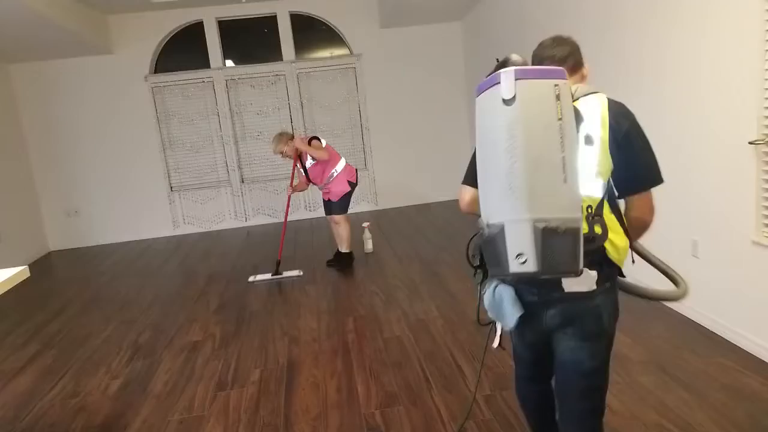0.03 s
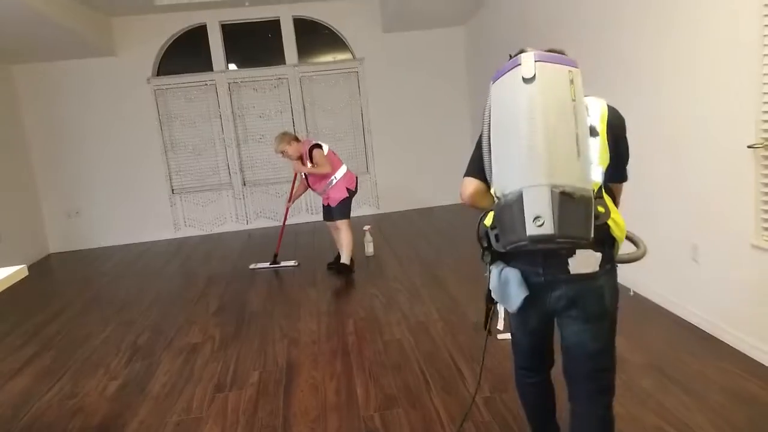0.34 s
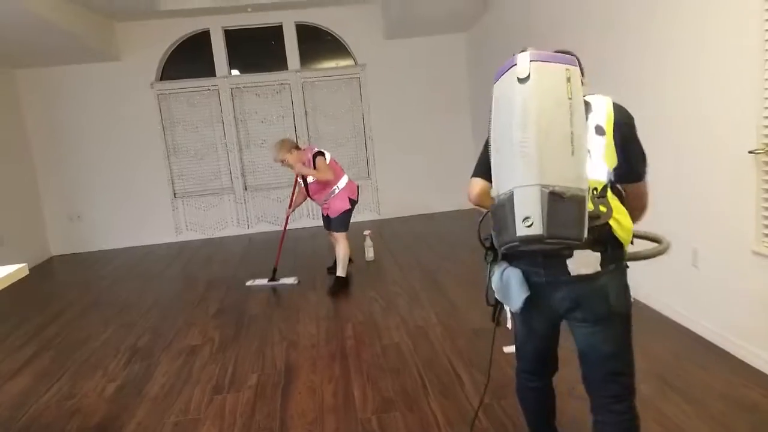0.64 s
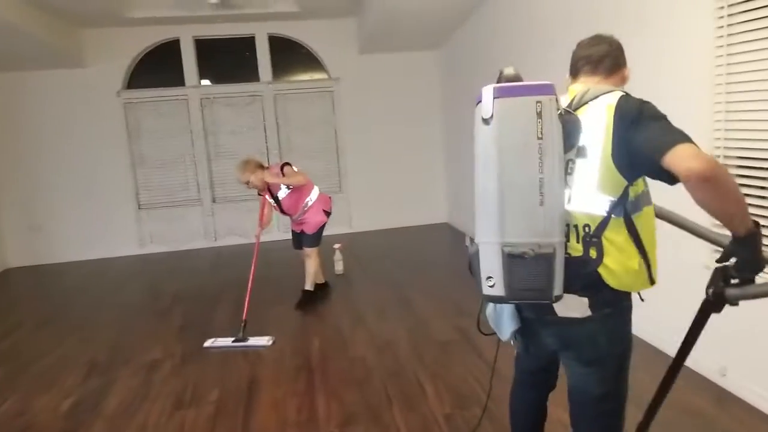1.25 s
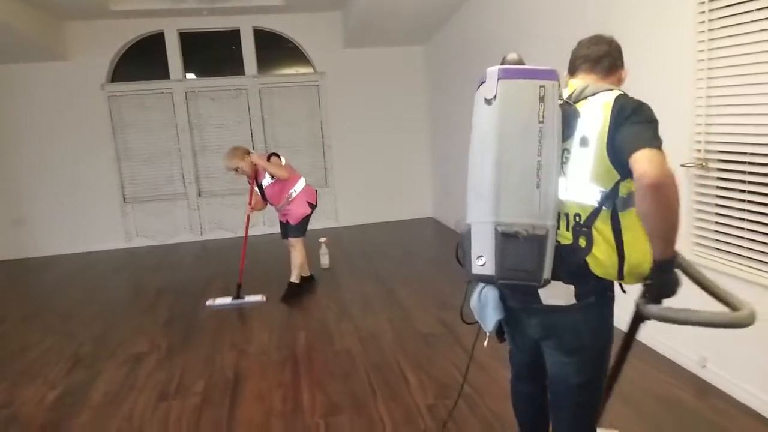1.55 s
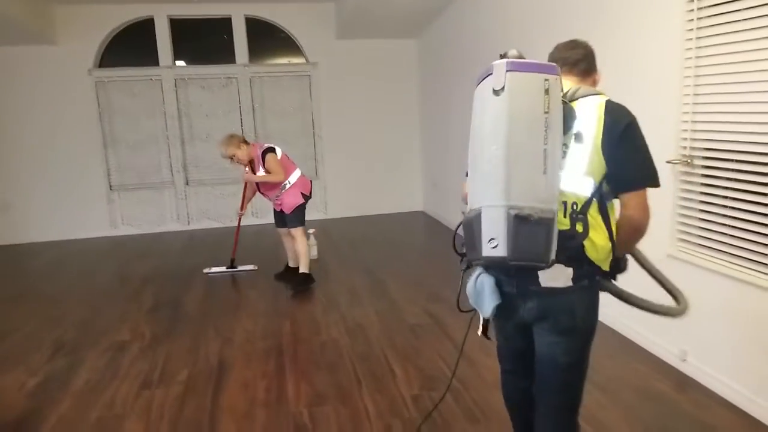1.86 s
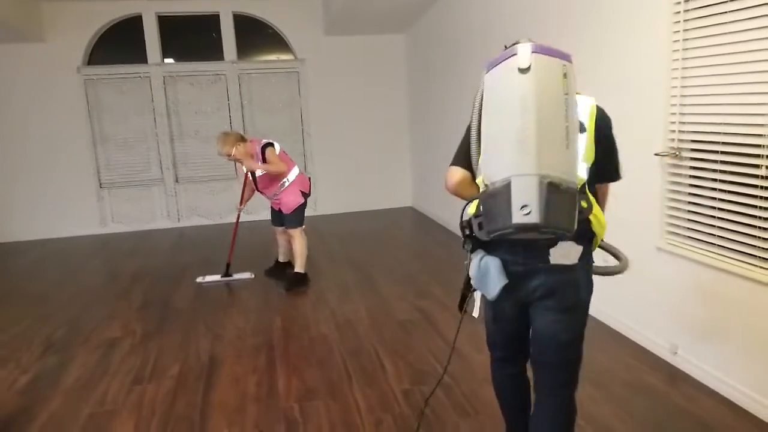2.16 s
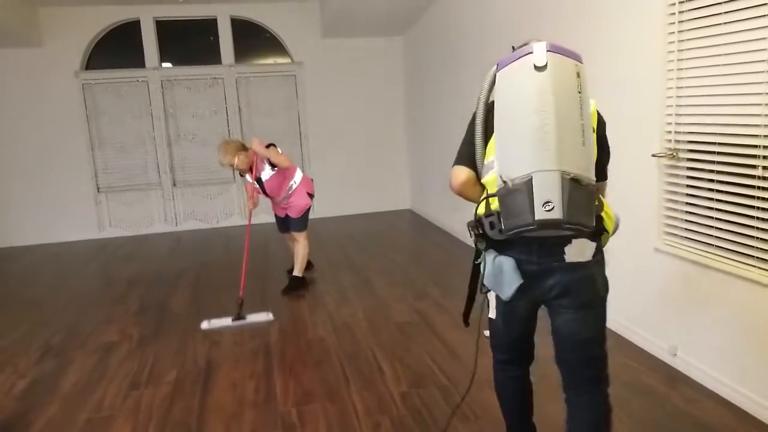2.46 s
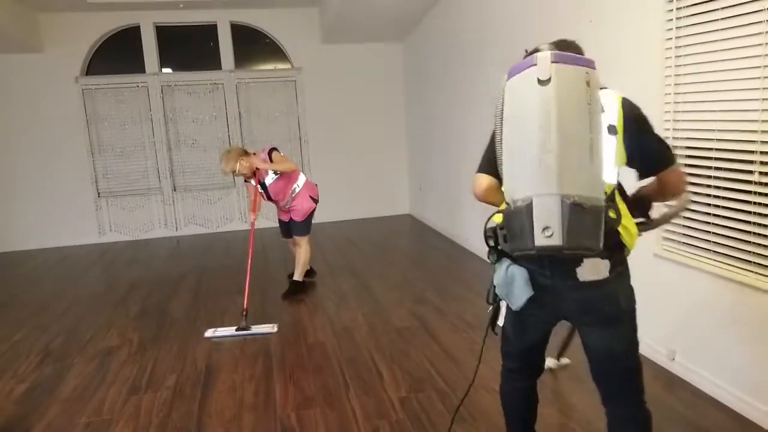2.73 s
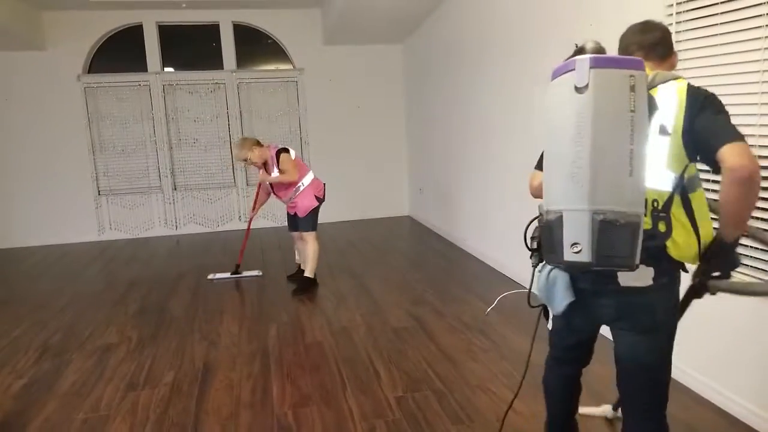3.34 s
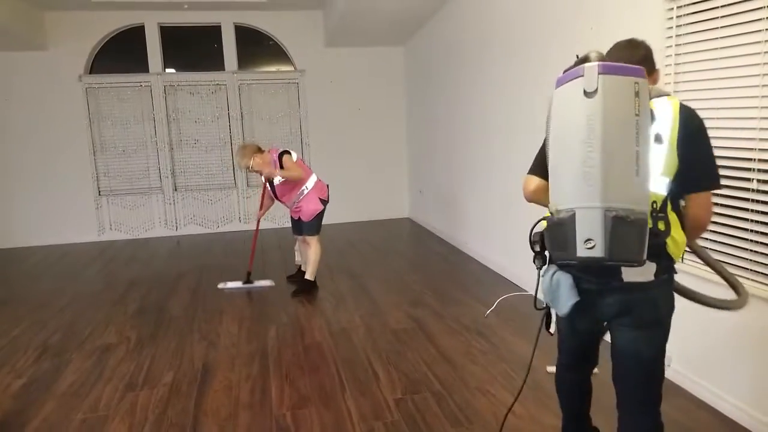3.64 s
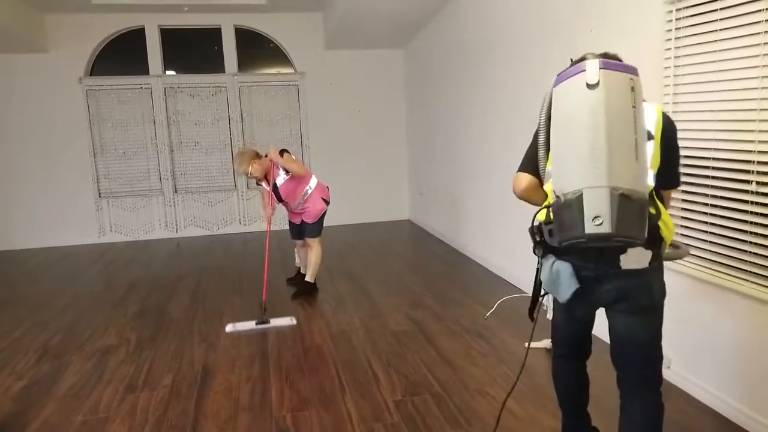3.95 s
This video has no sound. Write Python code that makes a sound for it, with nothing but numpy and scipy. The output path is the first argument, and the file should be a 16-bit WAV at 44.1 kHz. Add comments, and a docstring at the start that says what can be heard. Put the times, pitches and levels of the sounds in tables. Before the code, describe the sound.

A vacuum cleaner runs throughout in an empty room, a steady rush of air with a motor hum and a thin, wavering hose whistle. It hisses more on the left during the first second. The nozzle roars with a rising rasp from about 0.4 to 0.9 seconds and again from 2.2 to 2.7, then makes a few faint strokes. Very soft footsteps thud on the wooden floor underneath.

```python
"""An empty room with a wooden floor, where someone works with a backpack vacuum cleaner.
Churning air makes a steady rush, louder on the left at first. The floor nozzle roars on two
strong strokes and a few faint ones, and air squeezed under it rasps. Air flowing through the
ribbed hose whistles, gliding as the hose flexes. The spinning motor hums, and soft footfalls
thud on the floorboards beneath it all."""
import sys
import numpy as np
from scipy import signal
from scipy.fft import rfft, irfft
from scipy.io import wavfile
from scipy.ndimage import map_coordinates

SR = 44100
rng = np.random.default_rng(int(sys.argv[2]) if len(sys.argv) > 2 else 0)


def to_wav(s):
    """Save 16-bit WAV."""
    ch = np.atleast_2d(s).T  # columns
    pcm = np.round(np.clip(ch, -1, 1) * 32767)  # PCM
    wavfile.write(sys.argv[1], SR, pcm.astype(np.int16))


N = 176400

# tone colour of the air rush that fills the room: f/Hz, relative level/dB
RUSH_SPECTRUM = [(25, -26), (55, -26.5), (115, -19.5), (190, -14.5), (265, -3), (340, -6), (420, 1.5),
                 (560, 5.5), (800, 3.5), (1150, 3.5), (1700, 6.5), (2700, 6), (3600, 7), (4500, 7),
                 (5500, 4.5), (6400, 3), (6950, -0.5), (8200, 1.3), (9200, -1), (10800, -0.6),
                 (13000, -2.5), (15800, -4)]
# resonances (favoured pitches) of the housing and wand: f/Hz, width/Hz, boost/dB
HOUSING_RESONANCES = [(642.5, 31, 8.5), (754, 52, -1), (1031, 69, 6.5), (1375, 22, 5), (6136, 400, 5),
                      (10440, 130, 5)]
# how far the rush leans to the left: f/Hz, left minus right/dB
RUSH_BALANCE = [(60, -2), (270, 4.5), (470, 0.5), (700, 4.5), (1100, 1.5), (2000, 1), (4200, 2.5),
                (6200, -1), (15000, 0.5)]
# loudness of the rush: t/s, level/dB
RUSH_LOUDNESS = [(.12, -28.5), (.45, -25.5), (.9, -25.5), (1.25, -26), (1.7, -27), (1.95, -26),
                 (2.35, -26.5), (2.9, -26.5), (3.06, -26.5), (3.2, -25.5), (3.6, -26), (4, -27)]
# rise and fall of the rush's treble: t/s, boost/dB
RUSH_TREBLE = [(.12, 0.98), (.8, -0.67), (1.2, -0.47), (1.4, 0.75), (1.8, 0.68), (2.05, -0.44), (2.3, -1.4),
               (2.6, -0.01), (3.2, -.6), (3.7, 0.72), (4, 0.53)]
# tone colour of the hiss that reaches the left side directly: f/Hz, relative level/dB
HISS_SPECTRUM = [(30, -33), (150, -8), (200, -11.5), (270, -6), (350, -11), (600, 2), (800, 10), (950, 0),
                 (1400, 1.5), (2000, 4), (2900, 6.5), (4200, 7.5), (5400, 3.5), (6500, -2.5), (8200, -3.5),
                 (9300, -6.5), (13000, -14), (14300, -6), (15500, -4.5)]
# nearness of that hiss: t/s, share of full strength
HISS_NEARNESS = [(.12, 0.55), (.3, 0.54), (.58, 0.67), (.8, 0.42), (.98, 0.22), (1.1, 0.01), (1.4, 0)]
# how alike the air noise is at the two ears: f/Hz, likeness (0 = unrelated, 1 or more = the same)
EAR_LIKENESS = [(60, .92), (200, 0.7), (420, 1.23), (740, 0.2), (1220, 0), (4000, 0.05), (15000, 0)]
# patches of sound lifted or sunk by shifting reflections: depth/dB, width/Hz, lifetime/s
SWIRL_PATCHES = [(1.6, 110, .13), (1.1, 450, .1)]
# tone colour of the nozzle's roar: f/Hz, relative level/dB
ROAR_SPECTRUM = [(60, -45), (160, -23), (230, -22.5), (330, -12.5), (410, -7), (520, -13), (620, -0.5),
                 (830, -1.5), (1000, 0), (1420, -2), (2000, -1), (2700, -9), (4200, -9), (7000, -38),
                 (15000, -53)]
# resonances of the nozzle: f/Hz, width/Hz, boost/dB
NOZZLE_RESONANCES = [(424, 81, 7), (580, 50, 2.5), (793, 160, 1.5), (1374, 51, 4.5), (1397, 25, 4.5)]
# nozzle strokes: start/s, end/s, full level/dB, left minus right/dB
NOZZLE_STROKES = [(0.432, 0.88, -25, 4), (2.151, 2.656, -29, 0.5), (2.842, 2.94, -37, 0),
                  (3.221, 3.307, -38, 5), (3.42, 3.561, -58, 4)]
# rasps in the narrowing gap under the nozzle: start/s, end/s, first f/Hz, last f/Hz, level/dB
GAP_RASPS = [(0.509, 0.655, 410.6, 453, -35), (.52, 0.782, 659.6, 862, -34.5),
             (0.659, 0.919, 1250, 1502, -32), (2.183, 2.32, 680, 898, -30.5),
             (2.271, 2.421, 938, 1100, -33), (2.444, 2.621, 1952, 2170, -34),
             (2.539, 2.79, 1382, 1403, -35), (3.485, 3.576, 760, 796, -34)]
# the hose's whistle: t/s, f/Hz, relative level/dB
HOSE_WHISTLE = [(.12, 3490, -38), (.22, 3500, -36), (.29, 3510, -23.5), (.33, 3510, -23), (.35, 3510, -37),
                (.385, 3460, -38), (.4, 3435, -23), (.45, 3425, -24), (.5, 3410, -32), (.58, 3160, -40),
                (.78, 3120, -38.5), (.95, 3200, -43), (1.03, 3350, -40.5), (1.16, 3360, -42.5),
                (1.3, 3440, -38.5), (1.55, 3570, -42), (1.68, 3530, -47), (1.86, 3740, -51),
                (1.9, 3640, -34), (1.94, 3510, -40), (1.99, 3445, -31.5), (2.12, 3425, -34),
                (2.16, 3320, -33.5), (2.22, 3200, -42), (2.4, 3080, -48), (2.53, 3025, -42),
                (2.71, 3070, -45), (2.78, 3180, -36.5), (3.0, 3205, -39.5), (3.09, 3235, -37.5),
                (3.17, 3255, -32), (3.28, 3280, -35), (3.35, 3480, -37.5), (3.41, 3550, -40),
                (3.455, 3590, -31), (3.5, 3620, -39), (3.55, 3650, -38), (3.7, 3510, -43),
                (3.83, 3540, -42), (3.88, 3530, -34.5), (4.0, 3520, -35)]
# turns of the motor per second: t/s, f/Hz
MOTOR_SPEED = [(.12, 477), (.3, 473), (.54, 472), (.91, 466), (1.51, 464), (1.72, 467), (2.1, 472),
               (2.61, 465.6), (3.45, 464.8), (3.73, 464)]
# loudness of the hum as the machine moves through the room: t/s, level/dB
HUM_LOUDNESS = [(.12, -40), (.34, -37.5), (.45, -34), (.7, -36), (1.2, -42), (1.68, -40), (1.78, -45.5),
                (2.0, -40.5), (2.23, -36), (2.3, -47), (2.42, -40.5), (2.77, -39), (2.98, -40.5),
                (3.06, -45.5), (3.3, -46), (3.41, -43.5), (3.58, -39.5), (3.78, -54), (3.98, -45.5)]
# higher tones of the motor: multiple of its speed, level/dB
MOTOR_OVERTONES = [(2, -56), (3, -52), (4, -55), (22, -55)]
# steps on the floorboards: t/s, peak level/dB, f/Hz
FOOTSTEPS = [(.6, -50, 112), (0.777, -48, 62), (.96, -50, 90), (1.107, -48, 92.5), (1.42, -60, 85),
             (1.745, -56, 91), (3.286, -50.5, 75.1), (3.335, -50, 165), (3.605, -59, 65.6)]


def airflow(nearness):
    """Churning air fills the room, brighter and duller by turns; at first it also hisses on the left."""
    (db,), (treble_db,) = in_time(RUSH_LOUDNESS), in_time(RUSH_TREBLE)
    rush = air_noise(RUSH_SPECTRUM, HOUSING_RESONANCES, RUSH_BALANCE)
    rush = rush * from_db(db + .35 * drift(30))  # a slight flutter
    body = below(rush, hz=7000)
    treble = (rush - body) * from_db(treble_db)
    hiss = air_noise(HISS_SPECTRUM) * nearness * from_db(-24.5) * pan(db=14.5)
    return body + treble + hiss


def nozzle(treble_lag_s=.03):
    """Air sucked in at the floor roars; each stroke starts dark and ends bright."""
    t = np.arange(N) / SR
    roar = air_noise(ROAR_SPECTRUM, NOZZLE_RESONANCES)
    bass = below(roar, hz=1200)
    strokes = stroke_strength(t) * bass + stroke_strength(t - treble_lag_s) * (roar - bass)
    return strokes * from_db(.45 * drift(25))  # a slight flutter


def stroke_strength(t, rise_s=.18, fade_s=.14):
    """Left and right strength of the strokes: each builds up, then dies away after its end."""
    out = 0
    for start, end, db, pan_db in NOZZLE_STROKES:
        rise = np.clip((t - start) / rise_s, 0, 1)
        fade = np.exp(-np.maximum(t - end, 0) / fade_s)
        out = out + rise * fade * from_db(db) * pan(pan_db)
    return out


def rasps():
    """Air squeezed under the nozzle rasps, climbing in pitch as the gap closes."""
    out = 0
    for start, end, first_hz, last_hz, db in GAP_RASPS:
        progress = np.clip((np.arange(N) / SR - start) / (end - start), 0, 1)
        hz = first_hz + (last_hz - first_hz) * progress
        out = out + from_db(db) * np.sin(np.pi * progress) * noise_band(hz, width_hz=135)
    return out


def hose(nearness, waver_db=2.2, jitter_hz=13):
    """Air in the ribbed hose makes a breathy whistle that glides with the flow."""
    hz, db = in_time(HOSE_WHISTLE)
    gain = from_db(db + waver_db * drift(30))
    tone = gain * sine(hz + jitter_hz * drift(96))
    whistle = from_db(-4) * tone + from_db(-6) * room(tone)
    breath = gain * from_db(-8) * noise_band(hz, width_hz=200)
    upper_resonance = from_db(-47) * noise_band(1.22 * hz, width_hz=120)
    return (whistle + breath + upper_resonance) * pan(db=2.5 + 8 * nearness)


def motor(waver_db=1.2, jitter_hz=1.5):
    """The motor hums, one vibration per turn, and its faint overtones echo round the room."""
    (hz,), (db,) = in_time(MOTOR_SPEED), in_time(HUM_LOUDNESS)
    hz = hz + jitter_hz * drift(13.3)
    hum = sine(hz) * from_db(db + waver_db * drift(16)) * pan(db=6.5)
    overtones = sum(from_db(level) * sine(multiple * hz) for multiple, level in MOTOR_OVERTONES)
    return hum + room(overtones)


def footfalls(rise_s=.006, ring_s=.02):
    """Each step shakes the floorboards for a few swings, making a low thud."""
    out = 0
    for start, db, hz in FOOTSTEPS:
        age = np.maximum(np.arange(N) / SR - start, 0)
        strength = (1 - np.exp(-age / rise_s)) * np.exp(-age / ring_s)
        thud = strength * np.sin(2 * np.pi * hz * age)
        out = out + from_db(db) * thud / np.abs(thud).max()
    return (out + from_db(-11) * room(out)) * pan(db=5)


def air_noise(spectrum, resonances=(), balance=None, ripple_db=3, ripple_fade_hz=2510):
    """Churning air at both ears, coloured by resonances and by the room."""
    hz = np.maximum(np.arange(N // 2 + 1) * SR / N, 1)
    peaks_db = sum(boost / (1 + (2 * (hz - f) / width) ** 2) for f, width, boost in resonances)
    # the room adds small random peaks and dips, weaker in the treble
    grid_hz = np.arange(0, SR / 2, 20)
    ripple = np.interp(hz, grid_hz, rng.standard_normal(len(grid_hz))) / np.hypot(1, hz / ripple_fade_hz)
    db = at_hz(spectrum, hz) + peaks_db + ripple_db * ripple
    # one noise is the same at both ears, the other has opposite signs
    alike = np.clip(at_hz(EAR_LIKENESS, hz), -1, 1)
    shared, opposed = rfft(rng.standard_normal((2, N)))
    noise = from_db(db) * (np.sqrt(1 + alike) * shared + np.sqrt(1 - alike) * opposed * [[1], [-1]])
    if balance:
        noise = noise * pan(at_hz(balance, hz))
    return unit_level(swirl(irfft(noise, N)))


def swirl(x):
    """Reflections shift as the machine moves, so patches of pitch grow louder and softer."""
    hz, t, frames = signal.stft(x, SR, nperseg=1024)
    db = 0
    for depth, width, life in SWIRL_PATCHES:
        patches = rng.standard_normal((int(hz[-1] / width) + 2, int(t[-1] / life) + 2))
        positions = np.meshgrid(hz / width, t / life, indexing="ij")
        db = db + depth * map_coordinates(patches, positions, order=3, mode="nearest")
    return signal.istft(frames * from_db(db), SR)[1][:, :N]


def room(x, echo_s=.55):
    """Bare walls blur a sound into a fading echo, different at each ear."""
    t = np.arange(SR) / SR
    tail = rng.standard_normal((2, SR)) * from_db(-60 * t / echo_s)
    echo = signal.fftconvolve(x[None], tail, axes=1)[:, :N]
    return np.std(x) * unit_level(echo)


def noise_band(hz, width_hz):
    """A narrow band of stereo noise that follows a pitch curve."""
    phase = 2 * np.pi * np.cumsum(hz) / SR
    return np.array([drift(width_hz) * np.cos(phase) + drift(width_hz) * np.sin(phase)
                     for ear in range(2)])


def sine(hz):
    """A pure tone that follows a pitch curve."""
    return np.sqrt(2) * np.sin(2 * np.pi * np.cumsum(hz) / SR)


def drift(rate_hz):
    """A smooth random wander, typically of size 1; a higher rate wanders faster."""
    step, warm_up = 40, 2000  # one random value every 40 samples
    memory = np.exp(-2 * np.pi * rate_hz * step / SR)
    noise = rng.standard_normal(N // step + warm_up + 2)
    slow = signal.lfilter([1], [1, -2 * memory, memory ** 2], noise)[warm_up:]
    return np.interp(np.arange(N) / step, np.arange(len(slow)), unit_level(slow))


def below(x, hz):
    """The part of a sound below a pitch, with a gentle edge."""
    return signal.sosfiltfilt(signal.butter(2, hz, fs=SR, output="sos"), x)


def in_time(rows):
    """Join a table's points in time: one curve for each column after the first."""
    times, *columns = np.transpose(rows)
    return [np.interp(np.arange(N) / SR, times, column) for column in columns]


def at_hz(rows, hz):
    """Read a table between its frequencies, giving each octave equal space."""
    table_hz, values = np.transpose(rows)
    return np.interp(np.log(hz), np.log(table_hz), values)


def pan(db):
    """Left and right gains; positive decibels lean left."""
    return from_db(np.array([[.5], [-.5]]) * db)


def from_db(db):
    """Turn decibels into a gain to multiply by."""
    return 10 ** (np.asarray(db) / 20)


def unit_level(x):
    """Scale a sound to an average power of 1."""
    return x / np.sqrt(np.mean(x ** 2) + 1e-20)


def scene():
    """The vacuum cleaner and the footfalls together."""
    nearness, = in_time(HISS_NEARNESS)
    return airflow(nearness) + nozzle() + rasps() + hose(nearness) + motor() + footfalls()


def record(dry):
    """The sound starts suddenly, and its very highest treble is cut off."""
    start_s, cutoff_hz = .105, 15750
    started = np.arange(N) / SR > start_s
    treble_cut = signal.ellip(12, .1, 80, cutoff_hz, fs=SR, output="sos")
    return signal.sosfilt(treble_cut, dry * started)


dry = scene()
out = record(dry)
to_wav(out)
```